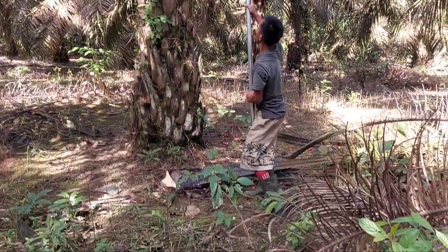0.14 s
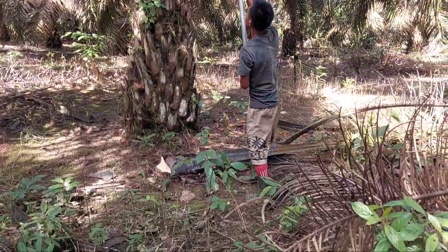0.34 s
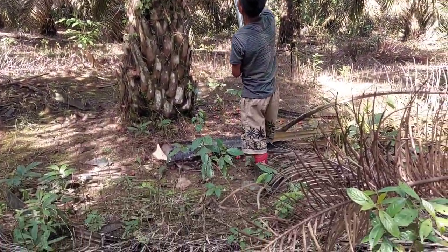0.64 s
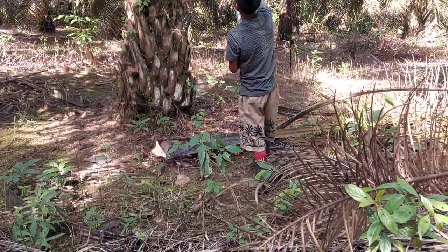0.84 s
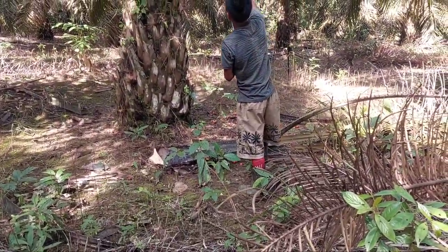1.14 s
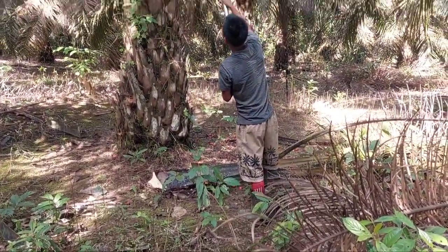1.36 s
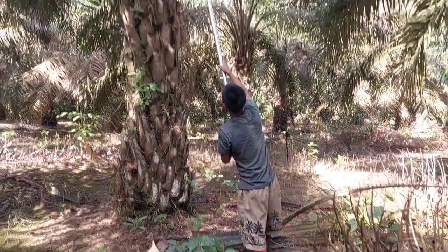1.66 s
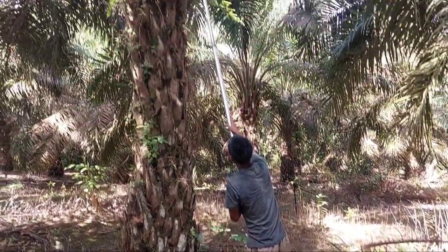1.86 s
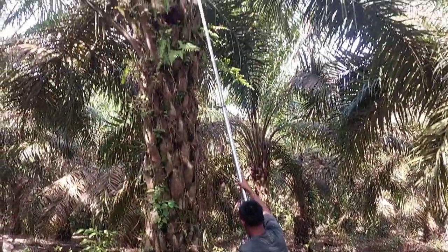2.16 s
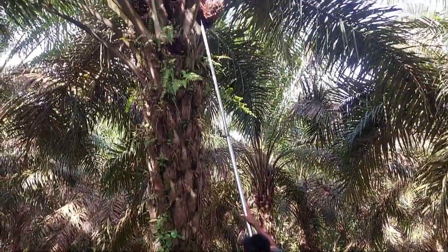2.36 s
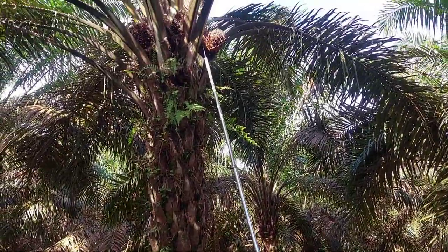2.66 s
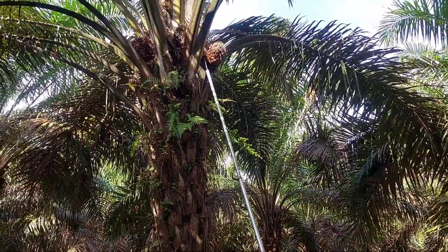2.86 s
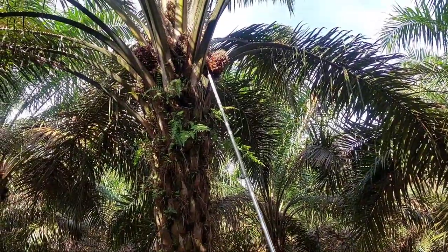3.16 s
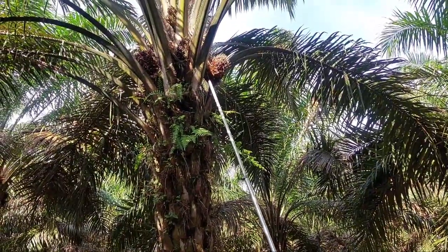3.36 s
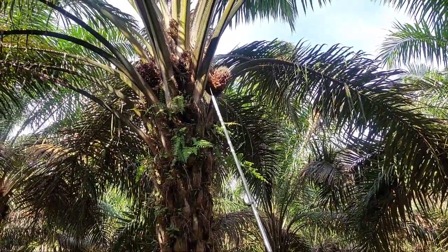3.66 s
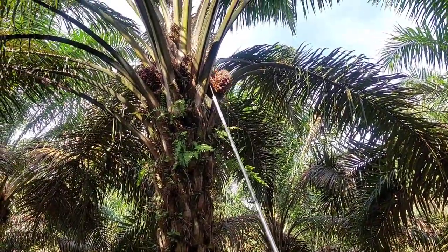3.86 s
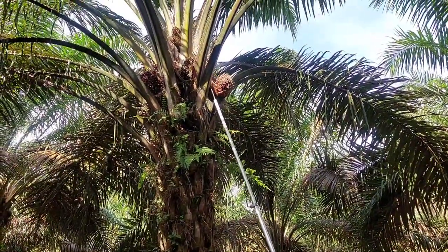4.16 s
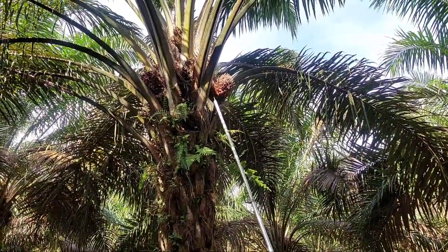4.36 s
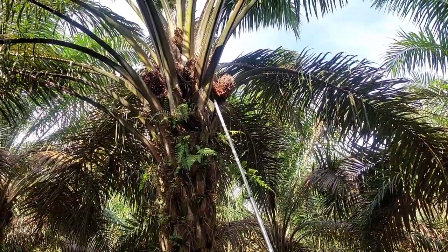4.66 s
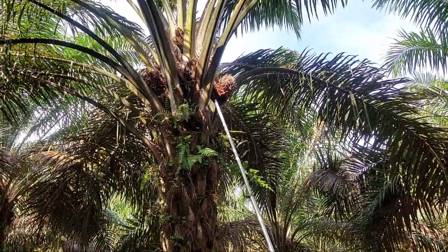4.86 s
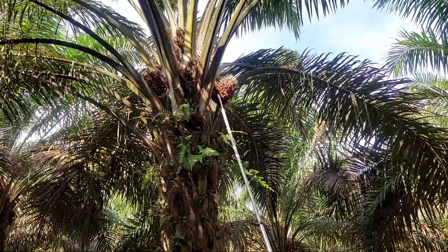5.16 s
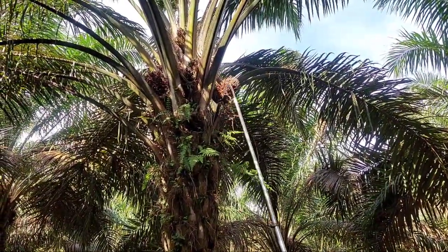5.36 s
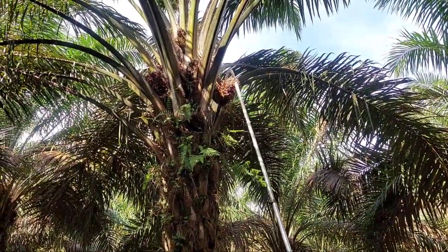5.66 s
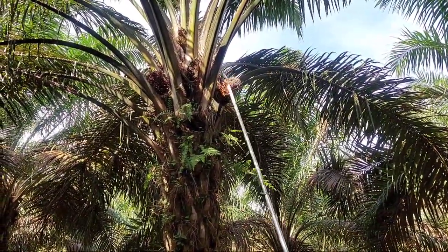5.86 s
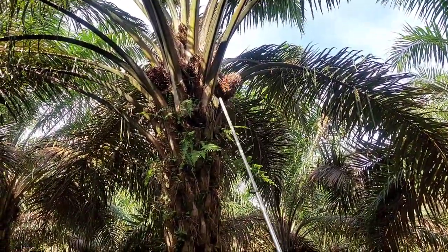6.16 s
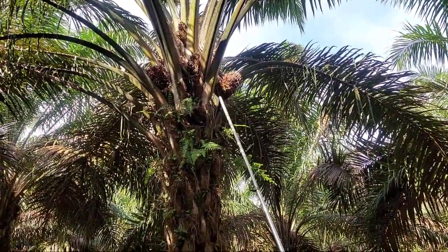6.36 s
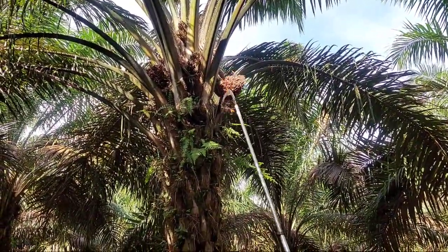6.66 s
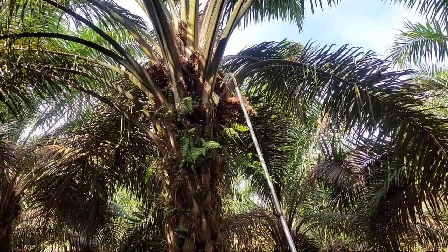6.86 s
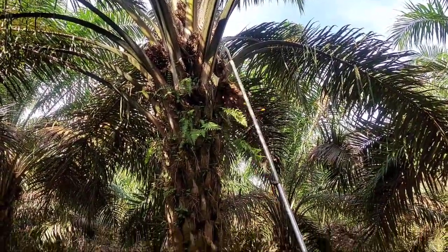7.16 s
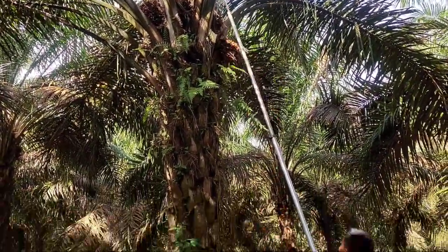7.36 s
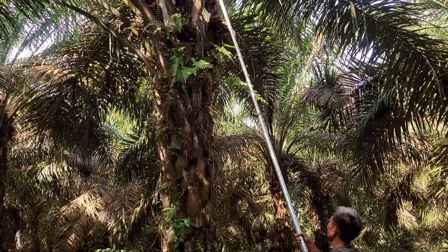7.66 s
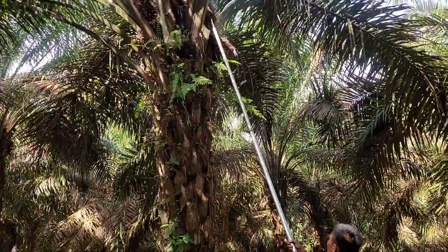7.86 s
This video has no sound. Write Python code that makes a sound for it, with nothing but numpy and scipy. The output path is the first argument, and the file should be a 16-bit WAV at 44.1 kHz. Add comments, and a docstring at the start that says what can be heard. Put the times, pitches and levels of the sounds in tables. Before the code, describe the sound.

A long blade tears at a woody palm stalk with sharp, ringing cracks and creaks, amid crisp leaf crackle and steady insect drone.

```python
"""In an oil palm plantation, a harvester raises a long pole sickle; dry fronds rustle and snap close by.
The blade bites into a fibrous stalk in short pulls; the stalk cracks, creaks and gives way: tiny random
breaks ring a set of stalk resonances. Filtered crackle makes the leaves, short low pulses the thuds.
Trunks and crowns scatter every crack; insects sing on (tones and noise) over a rumble and a late low hum.
The loudest cracks turn the recorder's gain down, and it recovers only slowly."""
import sys
import numpy as np
from scipy import signal
from scipy.fft import rfft, irfft
from scipy.io import wavfile
from scipy.ndimage import uniform_filter1d, map_coordinates

SR = 44100
rng = np.random.default_rng(int(sys.argv[2]) if len(sys.argv) > 2 else 0)


def generate_wav(signal):
    """Clip the signal to [-1, 1] and save it as 16-bit WAV at the path in sys.argv[1]."""
    frames = np.transpose(np.atleast_2d(signal))
    scaled = np.clip(frames, -1, 1) * 32767
    pcm = np.round(scaled).astype(np.int16)
    wavfile.write(sys.argv[1], SR, pcm)


N = 353671
T = np.arange(N) / SR  # time in s

# Tone colour of the heavy stalk base, also used for ground litter: (f/Hz, level/dB)
BASE_COLOUR = [(50, -32.5), (120, -11), (200, -4), (270, 3.5), (400, 2), (650, -8.5), (1200, -25)]
# Tone colour of a leaf blade: (f/Hz, level/dB)
LEAF_COLOUR = [(500, -31.5), (1200, -16.5), (1800, 1.5), (2300, 1.5), (3000, 0.5), (3600, 1.5), (4200, 2),
               (5200, 0.5), (7000, 4.5), (8500, -5), (12000, 1), (16000, -36)]
# Tone colour of the brittle leaf edge: (f/Hz, level/dB)
EDGE_COLOUR = [(4000, -41.5), (8500, -10.5), (10500, -2.5), (12300, 1), (14000, 0), (16000, -3.5)]
# Tone colour of the leaf's midrib: (f/Hz, level/dB)
RIB_COLOUR = [(40, -7), (90, -1), (170, -4.5), (300, -1), (500, -14), (720, -0.5), (1000, 3.5), (1250, -4),
              (1500, -3.5), (2600, -18.5)]


def cracks():
    """The separate breaks of the stalk, each with its own ring, splinters and bass."""
    # Stalk cracks, levels before the trims in crack():
    # (t/s, ring level/dB, splinter level/dB, bass level/dB, centre of the ring f/Hz, length of the break/s)
    breaks = [(0.594, -26, -23, -57, 2080, 0.011), (0.606, -15.5, -21.5, -54, 1330, 0.011),
              (0.636, -17, -17.5, -41, 1550, 0.012), (0.931, -22.5, -24.5, -56, 2020, 0.015),
              (0.951, -18, -20.5, -33, 2060, 0.0073), (1.008, -23, -26, -57, 2030, 0.02),
              (1.466, -32.5, -41, -62, 2090, 0.0088), (1.496, -23.5, -54, -53, 736, 0.01),
              (2.479, -16, -35, -55, 1400, 0.02), (3.788, -8.5, -36, -20, 1700, 0.0091),
              (3.81, -12, -28, -31, 604, .014), (3.968, -15.5, -34, -43, 1500, 0.0084),
              (4.456, -25, -22.5, -30, 1860, 0.0068), (4.51, -11.5, -20, -43, 1710, 0.016),
              (5.227, 1.5, -6.5, -38, 2030, 0.0056), (5.278, 0, -20, -28, 990, 0.0075),
              (5.384, 1.5, -4, -24, 1483, 0.0048), (5.637, -6.5, -13.5, -32, 1420, 0.0095),
              (5.886, -31, -50, -52, 1920, .0055), (6.128, -18, -28, -33, 2040, 0.026),
              (6.219, -5, -36, -15.5, 2150, 0.0042), (6.227, -2, -39, -18, 1600, 0.0027),
              (6.302, -1.5, -26, -49, 1970, 0.0044), (6.306, -0.5, -13, -24, 1380, 0.0074),
              (6.353, -20, -21, -29, 1330, .006), (6.634, 1, -3.5, -16, 1280, 0.0066),
              (6.682, -0.5, -14.5, -24, 1340, 0.0059), (6.714, 3.5, -3, -22.5, 2120, 0.0096),
              (6.764, -2, -10, -40, 1790, 0.011), (6.865, -4, -15, -28, 1420, 0.011),
              (7.106, -10, -21, -19, 1380, .01), (7.393, -25.5, -38, -29, 861, 0.0062),
              (7.633, -24.5, -47, -24, 721, 0.0078), (7.729, -30.5, -29, -24, 740, 0.0067),
              (7.965, -13, -23, -39, 965, 0.0078), (7.992, -3.5, -16, -44, 1900, 0.0056)]
    out = np.zeros(N)
    for start, db, splinter_db, bass_db, hz, length in breaks:
        add(out, start, crack(db, splinter_db, bass_db, hz, length))
    return out


def crack(db, splinter_db, bass_db, hz, length, size=6000):
    """One bundle breaks and takes its neighbours with it; the harder the break, the stronger the stragglers."""
    # Tone colour of splintering fibre: (f/Hz, level/dB)
    splinter_colour = [(1500, -36.5), (3500, 9), (5000, 4), (7200, -2.5), (8500, -11), (11000, -3),
                       (13000, -2.5), (16000, -9.5)]
    t = T[:size]
    collapse = np.exp(-(t / length) ** 2)
    stragglers = amp(-14.5 + 0.23 * db) * np.exp(-t / 0.025)
    burst = fibres(3500, 1.53, count=size) * (collapse + stragglers)
    burst[0] += 2.2  # the first, sharp break
    spray_fade = np.exp(-t / (0.26 * length)) + 0.07 * np.exp(-t / 0.025)
    spray = fibres(14000, 5.2, count=size) * spray_fade
    response = stalk_ring(hz, scatter_db=1.5, detune=0.02, focus_db=9.5)
    ring = unit_peak(signal.fftconvolve(burst, response)[:size])
    splinter = unit_peak(colour(spray, splinter_colour))
    bass = unit_peak(colour(burst, BASE_COLOUR))
    return amp(db - 6.0) * ring + amp(splinter_db - 3.5) * splinter + amp(bass_db - 5.0) * bass


def stalk_ring(centre_hz, scatter_db, detune, focus_db, size=3000):
    """Ring of the stalk; each place of breaking favours the resonances near its own centre."""
    # Resonances of the stalk before random detuning: (f/Hz, width/Hz, level/dB)
    resonances = [(531.7, 36, -4), (733, 132, -5), (956, 190, -6), (1231, 69, -0.5), (1405, 110, -2.5),
                  (1840, 105, -1), (2015, 93, -1.5), (2535, 146, -5.5), (2970, 86, -16), (3390, 45, -7.5),
                  (4560, 100, -16.5), (4920, 167, -14.5)]
    t = T[:size]
    hz, width, db = np.transpose(resonances)[:, :, None]
    chance = rng.standard_normal((3, len(resonances), 1))
    nearness = np.exp(-(np.log2(hz / centre_hz) / 0.12) ** 2)  # distance in octaves
    db = db + scatter_db * chance[0] + focus_db * nearness
    tones = np.sin(2 * np.pi * hz * (1 + detune * chance[1]) * t)
    modes = tones * np.exp(-np.pi * width * t)  # a wider resonance dies away faster
    ring = np.sum(np.sign(chance[2]) * amp(db) * width * modes, axis=0)
    return ring / np.linalg.norm(ring)


def creaks():
    """The half-cut stalk sticks and slips under its load: an even run of small cracks."""
    # Runs of slips, levels before random scatter and the trims in crack():
    # (first slip t/s, end t/s, ring level/dB, centre of the ring f/Hz, bass level/dB)
    slip_runs = [(5.488, 5.81, -20, 1300, -39), (5.986, 6.2, -25.5, 1880, -59),
                 (6.92, 7.09, -13.5, 1287, -25.5)]
    slip_period_s, slip_length_s = 0.0494, 0.0054
    splinter_db, scatter_db = -26, 1.5  # splinters are relative to the ring
    out = np.zeros(N)
    for start, end, db, hz, bass_db in slip_runs:
        for slip_start in np.arange(start, end, slip_period_s):
            slip_db = db + scatter_db * rng.standard_normal()
            add(out, slip_start, crack(slip_db, slip_db + splinter_db, bass_db, hz, slip_length_s))
    return out


def pulls():
    """The blade tears through fibres in jerks; the ring varies from piece to piece of each pull."""
    # Pulls of the blade, levels before a common trim:
    # (t/s, build-up/s, hold/s, ring level/dB, bass level/dB, splinter level/dB, centre of the ring f/Hz)
    strokes = [(0.569, 0.036, 0.065, -35, -64, -42, 740), (0.906, 0.018, .06, -35.5, -54, -54, 740),
               (1.14, 0.031, 0.027, -39.5, -51, -47, 740), (1.316, .03, 0.02, -43.5, -47, -53, 740),
               (1.465, 0.035, 0.039, -37.5, -47, -38.5, 1390),
               (1.878, 0.064, 0.051, -34.5, -47.5, -34, 1390), (2.404, 0.087, 0.045, -30, -40.5, -43, 1400),
               (3.73, 0.06, 0.025, -17, -29, -20, 639.6), (4.417, 0.033, 0.099, -33, -35, -35.5, 1250),
               (4.55, 0.029, 0.17, -74, -49.5, -47, 1210), (5.191, 0.042, 0.045, -12, -26, -18.5, 1210),
               (5.262, 0.028, 0.036, -9.5, -15.5, -14.5, 1060), (5.312, 0.013, 0.033, -47, -42, -23, 1300),
               (6.201, 0.022, 0.019, -22, -24, -21.5, 1300), (6.282, .02, 0.044, -29, -29, -26, 1390),
               (6.567, 0.034, 0.015, -18, -39, -31, 1390), (6.608, 0.05, 0.067, -16.5, -18.5, -17, 1210),
               (6.754, 0.014, 0.085, -29.5, -42.5, -27.5, 1300),
               (6.863, 0.094, 0.17, -37.5, -33, -30, 1210), (7.943, 0.042, .04, -20.5, -27, -22, 1390)]
    # Tone colour of torn fibre: (f/Hz, level/dB)
    torn_colour = [(1400, -3.5), (2600, 2.5), (3500, 3), (5000, 0), (7200, -2), (8500, -7.5), (11500, -2.5),
                   (16000, -10)]
    release_s = 0.015  # time constant with which the tearing stops
    out, step = np.zeros(N), SR // 28  # step: samples that share one ring
    jerks = amp(1.04 * walk(130))
    tear = unit(fibres(3500, 2.2) * jerks)
    splinters = unit(colour(fibres(12000, 3.0) * jerks, torn_colour))
    base = unit(colour(tear, BASE_COLOUR))
    for start, build, hold, db, bass_db, splinter_db, hz in strokes:
        force = effort(start, build, hold, release_s)
        out += force * (amp(splinter_db) * splinters + amp(bass_db) * base)
        for i in range(int(start * SR), min(int((start + .5) * SR), N), step):
            ring = stalk_ring(hz, scatter_db=3.0, detune=0.044, focus_db=7.0)
            piece = force[i:i + step] * tear[i:i + step]
            add(out, i / SR, amp(db) * signal.fftconvolve(piece, ring))
    return amp(-2.5) * out


def rustle():
    """Leaflets crumple in clusters of tiny fractures; their midribs crackle in the same clusters."""
    # Dry leaflets crushed or stirred:
    # (t/s, build-up/s, hold/s, blade level/dB, crisp edge level/dB, midrib level/dB)
    presses = [(0.0, 0.0013, 0.1, -40.5, -38, -56.5), (0.039, 0.008, 0.0049, -28.5, -32, -50),
               (0.086, 0.1, 0.21, -32.5, -34, -46.5), (0.272, 0.036, 0.032, -27.5, -29, -37),
               (0.51, 0.088, 0.3, -45.5, -63, -51.5), (1.308, .002, 0.0092, -47, -34, -52),
               (1.796, 0.027, .01, -45, -52, -53), (2.214, 0.26, 0.1, -38, -36, -49),
               (2.493, 0.03, 0.0078, -36, -27, -40), (2.573, 0.09, 0.25, -30, -27.5, -37.5),
               (2.893, 0.024, 0.0077, -29.5, -29, -43), (2.995, 0.11, 0.14, -39.5, -42, -54),
               (3.388, .07, 0.35, -55, -50, -84), (3.62, 0.055, 0.04, -44.5, -47, -58),
               (3.88, .1, 0.36, -48, -53, -64), (4.256, 0.11, 0.17, -46.5, -50, -53),
               (4.554, 0.068, .3, -51.5, -51, -63), (5.062, 0.12, 0.063, -42.5, -38, -60),
               (5.387, 0.053, 0.41, -50, -48, -49), (5.909, 0.08, .17, -45, -41.5, -48.5),
               (7.258, 0.037, 0.18, -48, -54, -59.5), (7.593, 0.081, .01, -34, -43, -39),
               (7.706, 0.036, 0.3, -44.5, -44.5, -62)]
    settle_s, settle_share = 0.012, 0.1  # time constant of settling, plus a share of the pressing time
    clusters = amp(3.0 * walk(260) + 1.0 * walk(70))
    crumple = flex(fibres(8000, 1.86) * clusters, lag_s=0.0009, swing=0.4, depth=1.0, rate=22)
    chips = flex(fibres(7000, 2.7) * clusters, lag_s=0.00042, swing=0.4, depth=0.7, rate=27)
    blade = unit(colour(crumple, LEAF_COLOUR))
    edge = unit(colour(chips, EDGE_COLOUR))
    rib = unit(colour(fibres(1100, 4.0) * clusters, RIB_COLOUR))
    out = np.zeros(N)
    for start, build, hold, db, crisp_db, body_db in presses:
        pressure = effort(start, build, hold, settle_s + settle_share * (build + hold))
        out += pressure * (amp(db) * blade + amp(crisp_db) * edge + amp(body_db) * rib)
    return out


def snaps(size=3000):
    """A leaflet splits in about two milliseconds and shivers briefly afterwards."""
    # Single leaflets snapping, levels before trims: (t/s, edge level/dB, blade and midrib level/dB)
    splits = [(0.044, -8.5, -23.5), (0.0522, -5, -16), (0.3476, -14, -16), (0.4182, -10, -18.5),
              (1.3105, -14, -27.5), (2.527, -7, -29), (2.538, -5, -27), (2.6359, -5, -38),
              (2.6486, -1.5, -14), (2.6958, -9, -22.5), (2.7221, -7, -21), (2.744, -4, -16),
              (2.7789, -3.5, -18), (2.824, -19, -24), (2.8564, -2.5, -20), (2.872, -16, -16.5),
              (2.9183, -3, -20), (2.9264, -1, -24), (3.0738, -11, -24.5), (3.093, -8.5, -35),
              (3.143, -7, -46), (3.1549, -9, -17.5), (3.2141, -5.5, -18.5), (3.4678, -9.5, -58),
              (3.4896, -17, -30), (4.2755, -15.5, -39), (4.29, -15, -29), (4.349, -12.5, -26.5),
              (4.356, -9, -23), (4.4584, -2, -50), (4.884, -15.5, -34.5), (5.3854, -3, -5),
              (5.558, -10, -21), (5.836, -13, -24.5), (6.0422, -20, -33), (6.11, -14, -25),
              (6.844, -16, -15), (7.002, -8, -16)]
    out, t = np.zeros(N), T[:size]
    split = t / 0.00092
    shape = split * np.exp(-split) + 0.027 * np.exp(-t / 0.015)  # split, then shiver
    for start, db, blade_db in splits:
        burst = fibres(16000, 3.0, count=size) * shape
        blade = unit_peak(colour(burst, LEAF_COLOUR))
        blade = blade + amp(-14) * unit_peak(colour(burst, RIB_COLOUR))
        edge = unit_peak(colour(burst, EDGE_COLOUR))
        add(out, start, amp(db - 10.5) * edge + amp(blade_db - 7.0) * blade)
    return out


def thuds(size=6000):
    """Soft earth stops a weight within a few cycles; loose litter crackles with it."""
    # Heavy things landing on soft ground, levels before a common trim: (t/s, level/dB, pitch f/Hz)
    landings = [(0.111, -41, 85), (0.554, -45.5, 75), (1.909, -42, 75), (0.943, -34, 197), (0.986, -41, 70),
                (2.381, -46, 81.46), (2.88, -38, 70), (3.305, -40, 223), (3.325, -44, 201),
                (3.816, -32, 64), (3.828, -30, 183), (3.949, -39.5, 385), (4.325, -39.5, 62),
                (4.537, -30, 218), (4.784, -40, 59), (5.303, -29.5, 175), (6.226, -20.5, 228),
                (6.712, -15, 240), (7.387, -40.5, 356), (7.607, -29, 261), (7.634, -28, 197),
                (7.642, -20.5, 189), (7.725, -28.5, 365), (7.927, -24, 250), (7.942, -18, 206)]
    out, t = np.zeros(N), T[:size]
    for start, db, hz in landings:
        cycles = hz * t
        push = np.sin(2 * np.pi * cycles) * cycles * np.exp(-cycles / 0.59)
        litter = colour(fibres(3000, 2.9, count=size) * np.exp(-t / 0.011), BASE_COLOUR)
        add(out, start, amp(db - 1.0) * (unit_peak(push) + amp(-7) * unit_peak(litter)))
    return out


def grove(x, early_db, early_t60, late_db, late_t60, size=44100):
    """Near leaves and trunks throw back bright, separate echoes, far crowns a faint wash."""
    # Tone colours: (f/Hz, level/dB); each t60 is the time in s to fade by 60 dB
    early_colour = [(150, -4.0), (600, -4.5), (1400, -6.5), (3500, 1.5), (7000, 3.5), (14000, 3)]
    late_colour = [(100, 14), (350, -5), (800, -31.5), (2000, -6.5), (5000, 3.5), (14000, -12.0)]
    t = T[:size]
    early = fibres(2500, 3.15, count=size) * amp(-60 * t / early_t60) * (t > .004)
    early = colour(early, early_colour)
    late = colour(rng.standard_normal(size), late_colour) * amp(-60 * t / late_t60)
    echoes = amp(early_db) * early / np.linalg.norm(early) + amp(late_db) * late / np.linalg.norm(late)
    return signal.fftconvolve(x, echoes)[:N]


def insects():
    """Many far insects merge into a whine, a throbbing buzz, a thin shimmer and a distant chorus."""
    # Wavering tones of the whine: (centre f/Hz, relative level/dB)
    whine_tones = [(4370, 1.5), (4420, 0), (4580, -27)]
    # Level of the whine before its flutter: (t/s, level/dB)
    whine_level = [(0.0, -48.5), (1.7, -55), (3.4, -50), (4.8, -55), (8.02, -54)]
    # Tone colour of the buzz: (f/Hz, level/dB)
    buzz_colour = [(5600, -24.5), (6400, -10), (6850, 1), (7100, 3.5), (7400, -4.5), (8200, -44)]
    # Tone colour of the shimmer: (f/Hz, level/dB)
    shimmer_colour = [(2500, -24), (3600, -6), (6000, -21), (8500, -6), (11000, 0), (14200, 5),
                      (16000, -10.5)]
    # Tone colour of the distant chorus: (f/Hz, level/dB)
    chorus_colour = [(1400, -19.5), (1900, 1.5), (2300, -3.5), (2850, 2), (3500, -28), (5000, -18.5)]
    # Slow swell and ebb of the chorus, before its quicker wandering: (t/s, level/dB)
    chorus_level = [(0.0, -57), (1.1, -54), (2.2, -63), (3.4, -71), (4.15, -52.5), (5.05, -66.5),
                    (5.6, -49), (6.1, -58), (6.5, -57), (8.02, -50.5)]
    buzz_db, shimmer_db = -48.5, -54.5  # middle levels, before wandering
    voices = np.zeros(N)
    for hz, db in whine_tones:
        turns = np.cumsum(hz + 22 * walk(160)) / SR
        voices += amp(db) * np.sin(2 * np.pi * turns)
    whine = unit(voices) * fader(whine_level) * amp(0.87 * walk(9))
    buzz = unit(colour(rng.standard_normal(N), buzz_colour)) * amp(buzz_db + 1.3 * walk(110))
    shimmer = unit(colour(fibres(12000, 2.5), shimmer_colour)) * amp(shimmer_db + 2.8 * walk(21))
    chorus = colour(rng.standard_normal(N), chorus_colour)
    chorus = unit(flex(chorus, lag_s=0.00071, swing=0.44, depth=0.54, rate=4))
    return whine + buzz + shimmer + chorus * fader(chorus_level) * amp(3.9 * walk(3.1))


def air():
    """A low, uneven outdoor rumble made of filtered noise."""
    # Tone colour of the rumble: (f/Hz, level/dB)
    rumble_colour = [(20, -31), (45, -6), (72, 1), (105, -4.5), (150, -4.5), (220, -17.5), (380, -16.5),
                     (600, -24), (1400, -27), (3000, -25)]
    # Level of the rumble before its wandering: (t/s, level/dB)
    rumble_level = [(0.0, -50.5), (1.3, -57), (3.0, -53.5), (4.9, -50), (5.6, -61), (7.2, -46), (8.02, -50)]
    rumble = unit(colour(rng.standard_normal(N), rumble_colour))
    return rumble * fader(rumble_level) * amp(0.8 * walk(9.9))


def hum():
    """A few low, wavering tones that swell towards the end."""
    # Gain of the hum, silent before the first point: (t/s, level/dB)
    hum_level = [(7.1, -62), (7.55, -49), (7.75, -41), (8.02, -37.5)]
    # Tones of the hum: (f/Hz, relative level/dB)
    hum_tones = [(50, -10), (73.6, -3.5), (143.5, -18)]
    tones = np.zeros(N)
    for hz, db in hum_tones:
        tones += amp(db) * np.sin(2 * np.pi * hz * T + 0.4 * walk(6))
    return np.sqrt(2) * tones * fader(hum_level)


def fibres(rate, spread_db, count=N):
    """Random tiny fractures, on average rate per second: many weak, a few strong."""
    chance = rng.random((3, count))
    strength = amp(spread_db * np.minimum(-np.log(chance[1] + 1e-9), 4))
    return (chance[0] < rate / SR) * strength * np.sign(chance[2] - .5)


def effort(start, build, hold, release):
    """Pressure builds up with the square of time, holds, then dies away."""
    t = T - start
    return np.clip(t / build, 0, 1) ** 2 * np.exp(-np.clip((t - build - hold) / release, 0, 20))


def flex(x, lag_s, swing, depth, rate):
    """Moving leaves give a sound a second path; the shifting lag keeps changing its colour."""
    lag = lag_s * np.exp(swing * walk(rate))
    second_path = map_coordinates(x, [np.arange(N) - np.round(lag * SR)], order=0)
    return x - depth * second_path


def walk(rate):
    """Smooth random wandering with spread 1, aiming at about rate new values per second."""
    k = max(int(SR / rate), 1)
    steps = np.repeat(rng.standard_normal(N // k + 1), k)
    return unit(uniform_filter1d(steps, k)[:N])


def fader(curve):
    """Gain over time from (t/s, level/dB) points; silent outside them."""
    return amp(np.interp(T, *np.transpose(curve), -np.inf, -np.inf))


def colour(x, points, size=4096):
    """Filter with the given (f/Hz, level/dB) response that never sounds ahead of its input."""
    hz, db = np.transpose(points)
    f = np.maximum(np.fft.rfftfreq(size, 1 / SR), 1)
    # folding the cepstrum (spectrum of the log response) gives minimum phase
    cepstrum = irfft(np.log(amp(np.interp(np.log(f), np.log(hz), db))))
    cepstrum[1:size // 2] *= 2
    cepstrum[size // 2 + 1:] = 0
    return signal.fftconvolve(x, irfft(np.exp(rfft(cepstrum))))[:len(x)]


def highpass(x, hz):
    """Take away the lows below hz."""
    return signal.sosfilt(signal.butter(3, hz, "high", fs=SR, output="sos"), x)


def amp(db):
    """Decibels to gain."""
    return 10 ** (np.asarray(db) / 20)


def unit(x):
    """Scale to a spread (standard deviation) of 1."""
    return x / (np.std(x) + 1e-12)


def unit_peak(x, size=130):
    """Scale so that the loudest three milliseconds have rms 1."""
    return x / np.sqrt(uniform_filter1d(x * x, size).max() + 1e-18)


def add(out, start, x):
    """Mix a short sound in at time start, in s."""
    i = max(int(start * SR), 0)
    out[i:i + len(x)] += x[:max(len(out) - i, 0)]


def gain_control(x, size=660):
    """A loud crack quickly turns the gain down; the background creeps back over seconds."""
    threshold_db, range_db = -14.5, 8  # where it starts, the most it takes away
    attack_s, recovery_db_per_s = 0.021, 2.5  # smoothing time, how slowly it lets go
    loudness_db = 10 * np.log10(np.abs(uniform_filter1d(x * x, size)) + 1e-12)
    wanted_cut_db = np.clip(loudness_db - threshold_db, 0, range_db)
    # a running maximum on a rising ramp: each cut is held, then shrinks at a steady pace
    recovery = recovery_db_per_s * T
    cut_db = np.maximum.accumulate(wanted_cut_db + recovery, axis=-1) - recovery
    pole = np.exp(-1 / (attack_s * SR))
    return x * amp(-signal.lfilter([1 - pole], [1, -pole], cut_db))


def scene():
    """The stalk's cracks, creaks and pulls carry no deep bass; the leaf litter is near and drier."""
    stalk = highpass(cracks() + creaks() + pulls(), 140.0)
    near = rustle() + snaps() + thuds()
    to_grove = stalk + amp(-1.0) * near
    echoes = grove(to_grove, early_db=-6.0, early_t60=0.27, late_db=-16.0, late_t60=0.57)
    return (stalk + near + echoes + insects() + air() + hum())[None]


def record(dry):
    """The hardest cracks duck the gain and still overload the recorder; the deepest bass and the top are cut."""
    voltage = np.clip(gain_control(dry), -.85, .85)
    top_cut = signal.ellip(10, .2, 70, 15550, fs=SR, output="sos")  # steep cut above 15550 Hz
    return signal.sosfilt(top_cut, highpass(voltage, 32.0))


dry = scene()
out = record(dry)
generate_wav(out)
```